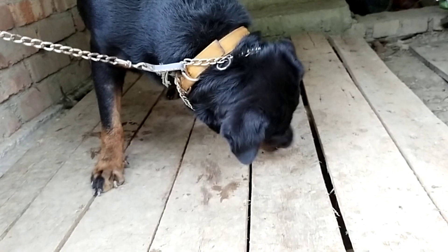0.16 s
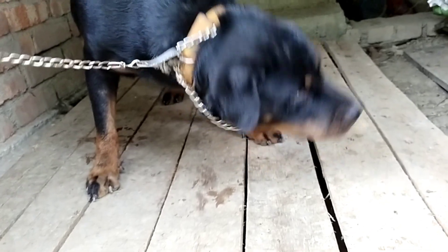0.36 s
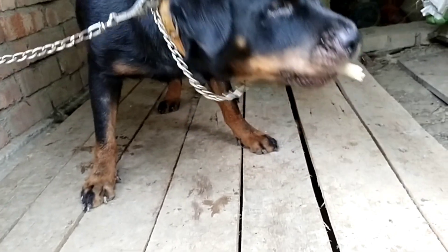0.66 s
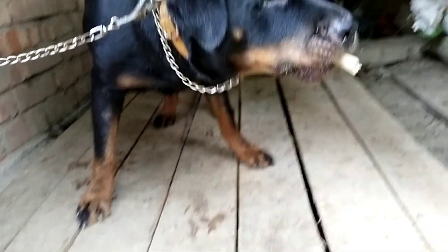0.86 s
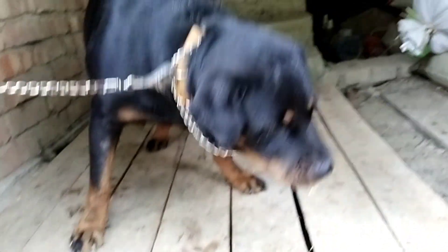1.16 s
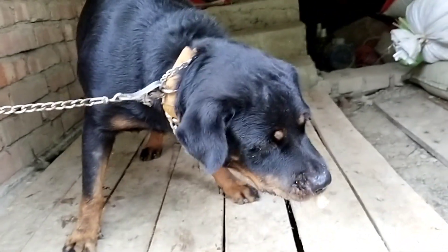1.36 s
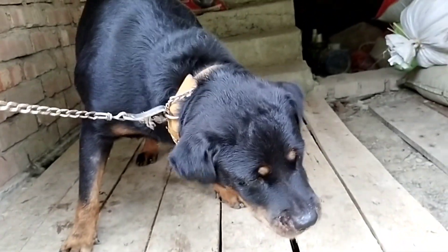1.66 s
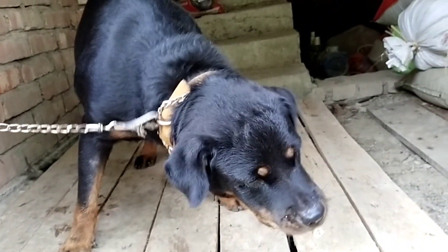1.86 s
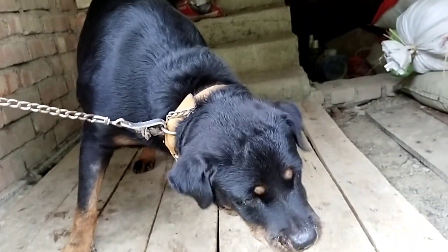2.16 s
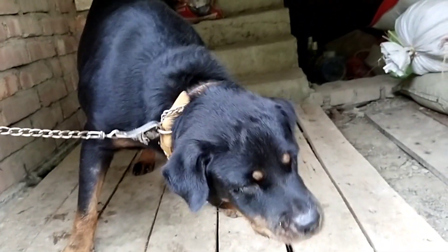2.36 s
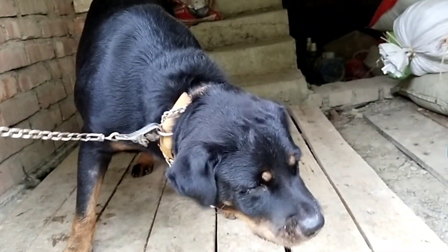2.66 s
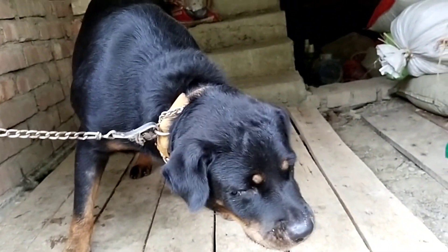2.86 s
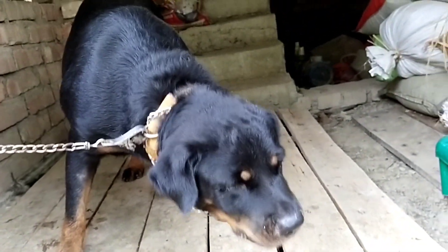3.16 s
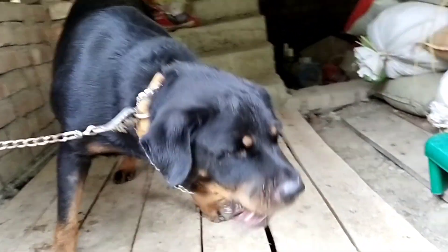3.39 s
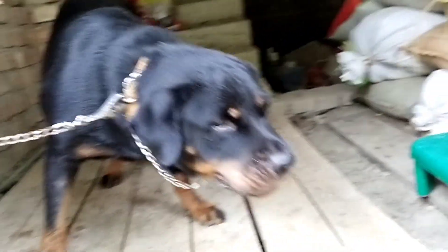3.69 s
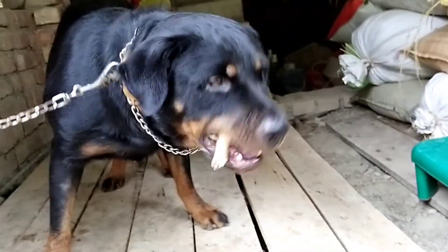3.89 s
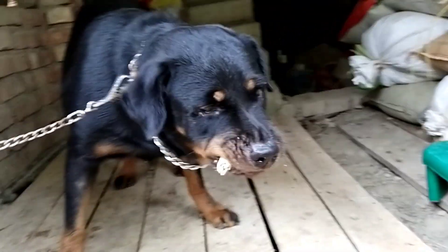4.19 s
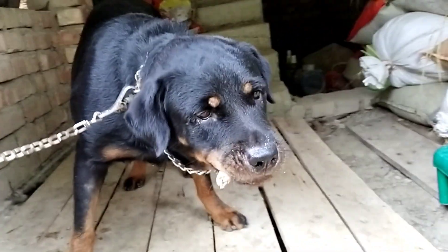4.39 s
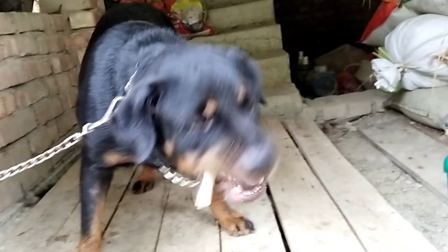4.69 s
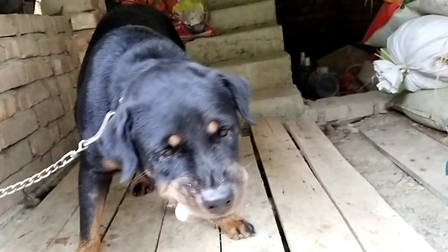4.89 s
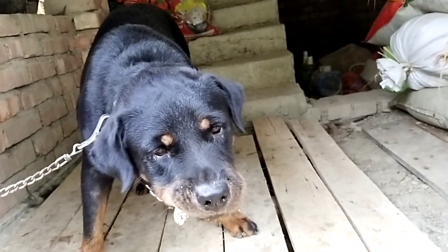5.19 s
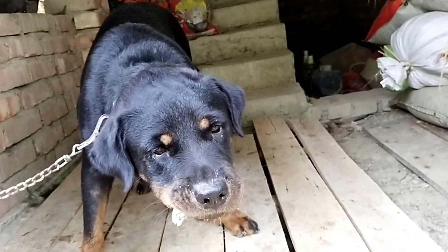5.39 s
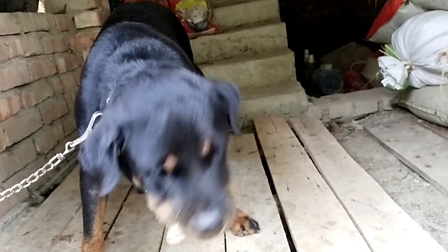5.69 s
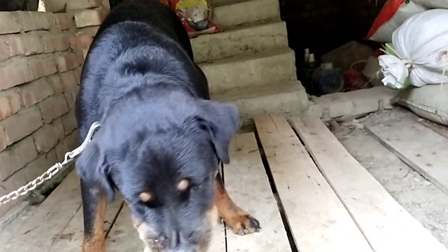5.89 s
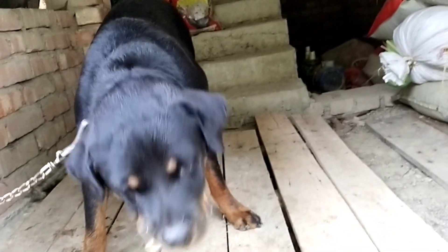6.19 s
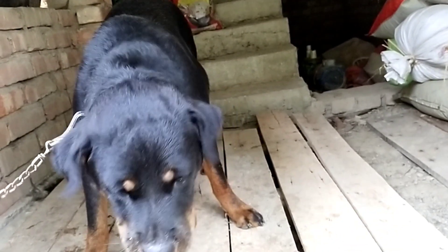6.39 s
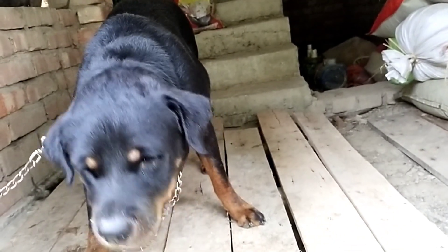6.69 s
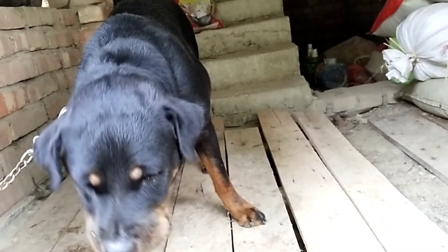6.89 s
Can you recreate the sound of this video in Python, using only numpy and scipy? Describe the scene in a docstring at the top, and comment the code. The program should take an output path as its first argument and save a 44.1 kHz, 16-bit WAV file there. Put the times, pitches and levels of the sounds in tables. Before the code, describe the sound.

A large dog gnaws a bone on wooden planks, heard very near. Irregular dry ticks and cracks mix with faint wet crunching, short airy snuffs and thin rough nose whistles. Two bursts of hard cracking come in the second half, the later one peaking in a piercing snap; then mostly breath, a low heavy crack and a final grind. Quiet yard air, faint hum and thin hiss lie beneath, with slight shed reflections.

```python
"""A short puff of air, a faint rough whistle and soft crunching come first, over the murmur of a yard.
A dog is chewing a bone on the plank floor of an open brick shed, close to a pair of microphones.
Cracks are runs of tiny fractures that ring mouth and bone; crunching is many small random rings.
Noise in a few resonances makes the nose's air, a low hum that comes and goes and a thin, flickering
high hiss; noise in many bands makes the yard. Dying noise adds the shed's reflections."""
import sys
import numpy as np
from scipy import signal
from scipy.io import wavfile
from scipy.ndimage import uniform_filter1d

SR = 44100
rng = np.random.default_rng(int(sys.argv[2]) if len(sys.argv) > 2 else 0)


def waveform_to_disk(signal):
    """Save audio, clipped to [-1, 1], as 16-bit WAV at the path in sys.argv[1]."""
    frames = np.transpose(np.atleast_2d(signal))
    scaled = np.clip(frames, -1, 1) * 32767
    samples = np.round(scaled).astype(np.int16)
    wavfile.write(sys.argv[1], SR, samples)


def ratio(d):
    """dB to gain"""
    e = np.asarray(d, float) / 20
    return 10 ** e


N = 310777  # length of the scene in samples

# All levels are those in the mix, before record() processes it.
# The yard's murmur comes and goes: (time [s], level [dB])
YARD_LEVEL = [(0.0, -62), (1.53, -63.5), (2.1, -61), (3.57, -62), (5.06, -59.5), (7.05, -61)]
# Tone colour of the yard: (frequency [Hz], relative level [dB per Hz])
YARD_SPECTRUM = [(40, -3), (101, 2), (1300, -7), (3470, -10.5), (4930, -13.5), (5870, -20.5), (6820, -21.5),
                 (16000, -26.5)]
# How alike noise is in both ears: (frequency [Hz], likeness [0 to 1])
EAR_LIKENESS = [(60, 1), (380, 0.047), (2400, 0.044)]
# Resonances of the hum: (frequency [Hz], width [Hz], relative level [dB])
HUM_PEAKS = [(70, 16, -5), (100, 14, 0)]
# The hum swells and fades: (start [s], end [s], level [dB])
HUM_SWELLS = [(.05, .3, -64), (.66, .79, -60.5), (.95, 1.3, -64), (1.55, 2.25, -71.5), (2.78, 3.1, -67.5),
              (3.75, 4.0, -75.5), (4.18, 4.3, -66), (4.68, 5.1, -62), (5.22, 5.58, -63.5), (5.6, 6.12, -60),
              (6.2, 6.8, -70), (6.92, 7.1, -61)]
# Resonances of the high hiss: (frequency [Hz], width [Hz], relative level [dB])
HISS_PEAKS = [(5625, 320, -3), (6004, 370, -3.5)]
HISS_DB = -69.5
# Resonances of the nose: (frequency [Hz], width [Hz], relative level [dB])
NOSE_PEAKS = [(2380, 170, -14), (3310, 1430, 4), (4160, 650, -0.5), (7650, 3800, -9.5)]
# Puffs of air through the nose: (start [s], end [s], level [dB])
NOSE_PUFFS = [(0, .14, -67), (.33, .58, -62.5), (1.47, 1.62, -67), (1.87, 2.08, -62), (2.12, 2.28, -59.5),
              (2.35, 2.56, -61), (2.62, 2.78, -72), (3.02, 3.3, -66.5), (3.37, 3.68, -65),
              (4.05, 4.18, -64.5), (4.53, 4.68, -61), (4.75, 5.04, -63), (5.29, 5.72, -64.5),
              (5.79, 5.98, -63), (5.98, 6.12, -60), (6.22, 6.58, -59.5), (6.9, 7.1, -61)]
# Faint rough whistles, perhaps air at nose and lips:
# (start [s], end [s], first pitch [Hz], last pitch [Hz], level [dB])
WHISTLES = [(0, 0.228, 4220, 4030, -72.5), (0.569, 0.801, 3330, 3310, -72.5),
            (0.726, 0.804, 2000, 2120, -68.5), (0.799, 1.066, 2680, 2470, -70),
            (0.938, 0.989, 2156, 1940, -57), (1.412, 1.621, 4420, 4300, -70),
            (2.154, 2.272, 4400, 4280, -61.5), (4.788, 4.853, 6900, 5896, -60.5),
            (5.285, 5.699, 4344, 4380, -69), (5.42, 5.566, 1220, 1193, -65.5),
            (6.036, 6.203, 2620, 2503, -66.5), (6.731, 6.888, 2320, 2310, -63),
            (6.913, 7.047, 2330, 2380, -67)]
# The jaw at work: (time [s], crunching level [dB])
JAW_WORK = [(0.0, -67), (0.55, -68), (1.15, -65.5), (1.4, -68.5), (1.94, -65), (2.47, -65.5), (2.72, -58.5),
            (2.79, -64.5), (3.7, -70.5), (4.48, -67), (4.8, -59), (4.95, -59), (5.3, -74.5), (5.91, -60),
            (6.18, -67.5), (6.65, -58), (7.05, -68)]
# The teeth grind, a run of small random fractures:
# (start [s], length [s], typical peak level [dB], middle mouth resonance [Hz])
GRINDS = [(0.432, 0.098, -61.5, 496), (1.097, 0.098, -58, 910), (2.087, .13, -53.5, 1000),
          (2.677, 0.075, -45, 1523), (3.95, 0.24, -63.5, 1200), (4.288, 0.091, -48, 988),
          (4.537, 0.1, -56.5, 1010), (4.844, 0.052, -38, 1220), (4.897, .08, -46, 1484),
          (6.337, 0.038, -50, 1572), (6.623, 0.036, -46, 990), (6.937, 0.17, -47, 1816)]
GRIND_GAP_S, GRIND_SNAP_DB = .005, -12  # gap scale; bright snap relative to the peak
GRIND_SPREAD_DB, GRIND_SPREAD_OCT = 3.0, 0.35
# Single cracks: (time [s], peak level [dB], mouth resonance [Hz], bright snap relative to peak [dB])
CRACKS = [(0.518, -40, 2460, -4.5), (0.524, -46, 570, -21.5), (1.173, -61, 1020, 17),
          (1.193, -45, 2300, -9), (1.598, -40, 2200, -11), (1.642, -37.5, 2340, -2),
          (1.743, -43, 1900, -8.5), (2.076, -42, 570, -5), (2.11, -39, 2380, -10.5),
          (2.13, -34.5, 2390, -2.5), (2.195, -47.5, 710, -1), (2.492, -41, 2400, -30),
          (2.517, -38, 2360, -7), (2.634, -38, 3550, -3), (2.676, -30.5, 1850, -15.5),
          (2.729, -36.5, 2500, -9), (2.952, -37, 540, -14.5), (3.005, -33.5, 510, -16),
          (3.208, -43.5, 2650, -12), (3.431, -40, 2160, -16.5), (3.558, -41.5, 1580, -15.5),
          (3.598, -33.5, 2300, -15.5), (3.797, -42, 1250, -32), (3.847, -43, 1440, -13),
          (3.941, -41.5, 1350, -34), (3.976, -43, 1890, -9), (4.014, -41, 1150, -10.5),
          (4.057, -37.5, 1480, -11), (4.069, -42, 1070, -5), (4.115, -32, 1230, -5.5),
          (4.233, -39, 890, -5), (4.242, -35.5, 2260, -12), (4.284, -25.5, 1070, -16.5),
          (4.314, -20, 1130, -10.5), (4.354, -23.5, 1046, -11), (4.64, -38.5, 960, -23.5),
          (4.857, -39, 1370, 10.5), (4.874, -41, 1100, -22), (4.89, -39.5, 2320, -13),
          (4.904, -26.5, 1440, -12), (4.931, -27, 1000, 0.5), (4.944, -25, 1440, -14),
          (4.968, -18.5, 1516, -13.5), (5.045, -3.5, 1796, -6), (5.731, -40.5, 1130, -10),
          (6.275, -43, 1700, -25), (6.51, -44, 970, -30), (6.563, -48.5, 500, -7),
          (6.621, -16.5, 560, -18.5), (6.929, -37, 2220, -12), (6.991, -27, 1220, -16)]
# Ringing modes of bone and jaw: (frequency [Hz], relative level [dB], time to fall 60 dB [s])
BONE_MODES = [(527, -9, 0.0067), (1070, -13.5, 0.012), (1752, -0.5, 0.0068), (2300, 0, 0.0073),
              (2890, 1.5, 0.0026), (3624, 9.5, 0.0065), (4080, 6.5, 0.0072), (6200, -21.5, .003)]
# Crumbling of a -39.5 dB crack, and its rise for each dB by which a crack is stronger
CRUMBLE_DB, CRUMBLE_PER_DB = -17, 0.03
# The head turns before the microphones: (time [s], left lag [ms], left minus right level [dB])
HEAD_TURNS = [(0, -.05, 1.5), (3.8, -.05, 1.5), (4.1, .065, .6), (5.8, .05, 1.2), (6.2, .17, 2.5)]
SHED_T60_S, SHED_DB, WALL_CUT_HZ = 0.27, -18, 5500


def rms_one(x):
    """Scale to an average strength (rms) of 1."""
    return x / np.sqrt(np.mean(x ** 2) + 1e-20)


def in_time(rows):
    """Read each column of a time table at every sample."""
    s, *columns = np.transpose(rows)
    return [np.interp(np.arange(N) / SR, s, c) for c in columns]


def at_hz(points, hz):
    """Read a frequency table, with pitch on a logarithmic scale."""
    table = np.array(points)
    return np.interp(np.log(hz), np.log(table[:, 0]), table[:, 1])


def drift(rate_hz):
    """Slow random wandering of spread 1: smoothed noise, made at every 40th sample."""
    r = np.exp(-80 * np.pi * rate_hz / SR)
    noise = rng.standard_normal(N // 40 + 2002)
    slow = signal.lfilter([1], [1, -2 * r, r * r], noise)[2000:]  # drop the settling time
    return np.interp(np.arange(N) / 40, np.arange(len(slow)), rms_one(slow))


def cut(x, hz, kind):
    """Butterworth filter of order 2."""
    return signal.sosfilt(signal.butter(2, hz, kind, fs=SR, output="sos"), x)


def pair(hz):
    """Stereo white noise, as alike in both ears as diffuse sound of that pitch."""
    alike = np.clip(at_hz(EAR_LIKENESS, hz), 0, 1)
    mid, side = rng.standard_normal((2, N))
    return np.sqrt(1 + alike) * mid + np.sqrt(1 - alike) * side * [[1], [-1]]


def resonant_air(peaks, flicker_db, flicker_hz):
    """Noise in resonances that flicker each on its own; rms 1."""
    total = 0
    for hz, width, db in peaks:
        band = rms_one(cut(pair(hz), [hz - width / 2, hz + width / 2], "band"))
        total = total + band * ratio(db + flicker_db * drift(flicker_hz))
    return rms_one(total)


def swells(rows, rise_s, fall_s):
    """Loudness curve of spans that rise, hold and die away in straight lines."""
    t, gain = np.arange(N) / SR, np.zeros(N)
    for start, end, db in rows:
        rise = np.clip((t - start) / rise_s, 0, 1)
        fall = np.clip((end - t) / fall_s, 0, 1)
        gain += ratio(db) * rise * fall
    return gain


def ring(clicks, hz, t60):
    """A resonator: a unit click starts a dying sine of height 1, down 60 dB after t60 seconds."""
    r, w = ratio(-60 / (t60 * SR)), 2 * np.pi * hz / SR
    return signal.lfilter([0, np.sin(w)], [1, -2 * r * np.cos(w), r * r], clicks + 1e-18)


def struck(tear, hz, t60):
    """One mode set ringing by a tear, scaled to height 1 in the average of both ears."""
    mode = ring(tear, hz, t60)
    return mode / np.abs(mode.mean(axis=0)).max()


def yard():
    """Wideband murmur: noise bands that swell and sink on their own, the treble more smoothly."""
    edges, out = 40 * 2 ** np.arange(0, 8.8, .3), 0
    for low, high in zip(edges, edges[1:]):
        patchy_db = 2.0 if low < 5000 else .8
        gain = ratio(at_hz(YARD_SPECTRUM, low) + patchy_db * drift(1.7))
        out = out + gain * cut(pair(low), [low, high], "band")
    return ratio(in_time(YARD_LEVEL)[0]) * rms_one(out)


def hiss():
    """Thin high hiss: noise in narrow, slowly flickering bands."""
    return ratio(HISS_DB) * resonant_air(HISS_PEAKS, flicker_db=2.0, flicker_hz=2.5)


def hum():
    """Low hum: noise in narrow bass bands that swells and fades."""
    gain = swells(HUM_SWELLS, rise_s=.05, fall_s=.07)
    return gain * resonant_air(HUM_PEAKS, flicker_db=1.5, flicker_hz=8.0)


def shed(x):
    """Dense reflections off brick and planks: dying noise, own for each ear, the treble fading first."""
    t = np.arange(SR // 2) / SR
    echo = rng.standard_normal((2, len(t))) * ratio(-60 * t / SHED_T60_S) * (t > .003)
    bright = 0.4 * echo * ratio(-90 * t / SHED_T60_S)  # dies faster than the dull part
    echo = cut(echo, WALL_CUT_HZ, "low") + bright
    return signal.fftconvolve(x[None], echo / np.sqrt(np.sum(echo[0] ** 2)), axes=1)[:, :N]


def whistles():
    """Narrow noise on a gliding pitch, fading in and out."""
    out = np.zeros((2, N))
    for start, end, first_hz, last_hz, db in WHISTLES:
        a, b = max(round(start * SR), 0), round(end * SR)
        share = np.linspace(0, 1, b - a)
        # slow noise around the pitch makes the tone rough
        wobble = cut(rng.standard_normal((2, 2, b - a + 2000)), 80, "low")[..., 2000:]
        pitch_hz = first_hz + (last_hz - first_hz) * share
        turn = np.exp(2j * np.pi * np.cumsum(pitch_hz) / SR)
        tone = rms_one(((wobble[0] + 1j * wobble[1]) * turn).real)
        out[:, a:b] += ratio(db) * tone * np.sin(np.pi * share ** 1.1) ** .5
    return out


def nose_puffs():
    """Air hissing in the nose: flickering noise in its resonances, starting fast and ending more slowly."""
    gain = swells(NOSE_PUFFS, rise_s=0.0042, fall_s=0.057)
    return gain * resonant_air(NOSE_PEAKS, flicker_db=2.0, flicker_hz=12.0)


def crunch():
    """Small splinters and wet smacks come at random, in clumps, each ringing a few cycles in the mouth."""
    sizes = ratio(2.2 * np.minimum(rng.exponential(1, N), 3.5)) * rng.choice([-1, 1], N)
    born = rng.random(N) < 3500 * ratio(2.5 * drift(30.0)) / SR  # around 3500 a second
    clicks = sizes * born
    pitches, dealt = np.geomspace(330, 3200, num=16), rng.integers(0, high=16, size=N)
    rings = 0
    for k, hz in enumerate(pitches):
        gain = (hz / 1000) ** 0.9 * ratio(4.0 * drift(4.0))
        rings = rings + gain * ring(clicks * (dealt == k), hz, 6.8 / hz)
    return ratio(in_time(JAW_WORK)[0]) * rms_one(rings)


def grinds():
    """Grinding teeth: rows of small cracks at uneven gaps, each with its own strength and pitch."""
    rows = []
    for start, length, db, mouth_hz in GRINDS:
        gap = rng.exponential(1, 30)
        strength, pitch = rng.standard_normal((2, 30))
        times = start + GRIND_GAP_S * np.cumsum(.5 + .6 * gap)
        for s, louder, higher in zip(times, strength, pitch):
            if s < min(start + length, N / SR):
                hz = mouth_hz * 2 ** (GRIND_SPREAD_OCT * higher)
                rows.append((s, db + GRIND_SPREAD_DB * louder, hz, GRIND_SNAP_DB))
    return rows


def fractures(t, db, crumble_db):
    """Sparse noise that builds up, stops short and crumbles; the ears hear its treble differently."""
    run_s = .0009 * ratio(.38 * (db + 30))  # a harder bite tears longer
    fracture = (t / run_s) * np.exp(-(t / run_s) ** 2)
    bits = (rng.random(len(t)) < .08) * rng.exponential(1.5, len(t))
    crumble = ratio(crumble_db) * np.exp(-t / 0.0091) * bits
    shape = fracture * (rng.random(len(t)) < .5) + crumble
    sparse = rng.standard_normal((3, len(t))) * shape
    return sparse[0] + .6 * cut(sparse[1:], 1500, "high")


def ringing(tear, db, mouth_hz, snap_db):
    """A tear rings the mouth and the modes of bone and jaw."""
    # light bites sound near the mouth pitch, hard ones across all modes
    focus_db = np.clip(-.25 * db, 1.0, 9.0)
    bone = 0
    for hz, mode_db, t60 in BONE_MODES:
        octaves = np.log2(hz / mouth_hz)
        near_db = -focus_db * np.maximum(-octaves, .9 * octaves)
        if hz > 3000:
            near_db += .6 * min(snap_db, 0)  # a dull bite hardly reaches the high modes
        # every bite holds the bone differently
        vary_db, detune_db = rng.normal(0, [1.5, .2])
        bone = bone + ratio(mode_db + near_db + vary_db) * struck(tear, hz * ratio(detune_db), t60)
    # a wide, low mouth rings longest
    mouth = ratio(2.4 * focus_db) * struck(tear, mouth_hz, .026 * (1000 / mouth_hz) ** .6)
    return cut(cut(cut(mouth + 20.0 * bone, 380, "high"), 380, "high"), 4900, "low")


def cracks():
    """Each crack is a quick run of fractures: its ringing body plus a bright snap with fine grit."""
    out, t = np.zeros((2, N + 4410)), np.arange(4410) / SR
    for s, db, mouth_hz, snap_db in CRACKS + grinds():
        crumble_db = CRUMBLE_DB + CRUMBLE_PER_DB * (db + 39.5)
        tear = fractures(t, db, crumble_db)
        body = ringing(tear, db, mouth_hz, snap_db)
        # fine grit smears the treble
        grit = .5 * ratio(crumble_db) * np.exp(-t / 0.018) * rng.standard_normal(tear.shape)
        snap = cut(cut(tear, 7800, "low") + grit, [4000, 11000], "band")
        at = round(s * SR)
        out[:, at:at + len(t)] += ratio(db) * body / np.abs(body).max()
        out[:, at:at + len(t)] += ratio(db + snap_db) * snap / np.abs(snap).max()
    return out[:, :N]


def facing(x):
    """The head's place sets delay and level between the microphones."""
    lag_ms, pan_db = in_time(HEAD_TURNS)
    n, half_lag = np.arange(N), lag_ms * SR / 2000  # half the lag, in samples
    left = np.interp(n - half_lag, n, x[0]) * ratio(pan_db / 2)
    right = np.interp(n + half_lag, n, x[1]) * ratio(-pan_db / 2)
    return np.array([left, right])


def scene():
    """Mouth and nose before the microphones, the mouth's reflections in the shed, and the surroundings."""
    mouth = cracks() + crunch()
    nose = nose_puffs() + whistles()
    reflections = ratio(SHED_DB) * shed(mouth.mean(axis=0))
    return facing(mouth + nose) + reflections + hum() + hiss() + yard()


def suppressor(x, margin_db, deepest_db, memory):
    """Noise suppression: each frequency is turned down while its running level stays near its quiet level."""
    spectrum = signal.stft(x, nperseg=1024, noverlap=768)[2]
    power = np.mean(np.abs(spectrum) ** 2, axis=0)
    power = signal.lfilter([1 - memory], [1, -memory], power)
    quiet = np.percentile(power, 30, axis=1, keepdims=True)
    quiet = uniform_filter1d(quiet, size=9, axis=0)  # smooth across frequency
    gain = np.maximum(1 - ratio(2 * margin_db) * quiet / (power + 1e-20), ratio(deepest_db))
    return signal.istft(spectrum * gain, nperseg=1024, noverlap=768)[1][:, :N]


def top_cut(x):
    """Nothing passes above the cut-off."""
    return signal.sosfilt(signal.butter(12, 16400, fs=SR, output="sos"), x)


def record(dry):
    """Deep bass is cut, steady noise suppressed, loud peaks rounded and extreme treble cut."""
    no_bass = cut(cut(dry, 55, "high"), 55, "high")
    clean = suppressor(no_bass, margin_db=0.0, deepest_db=-12.0, memory=.7)
    rounded = 1.171 * np.tanh(clean / 0.77)
    treble_cut = signal.cheby2(10, 50, 16100, fs=SR, output="sos")
    mix = signal.sosfilt(treble_cut, rounded)
    return top_cut(mix)


dry = scene()
out = record(dry)
waveform_to_disk(out)
```